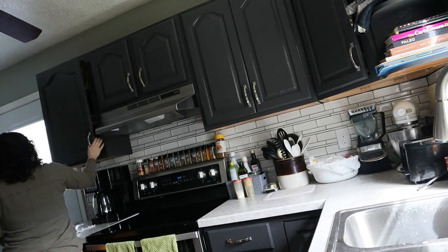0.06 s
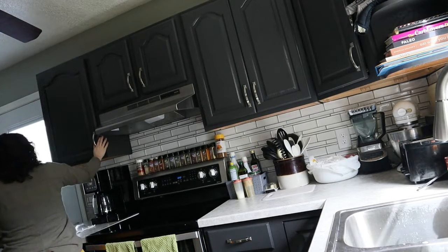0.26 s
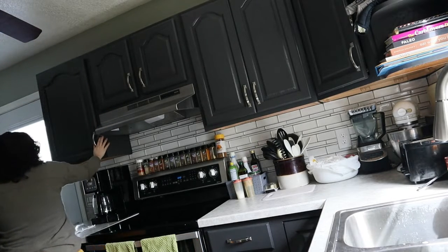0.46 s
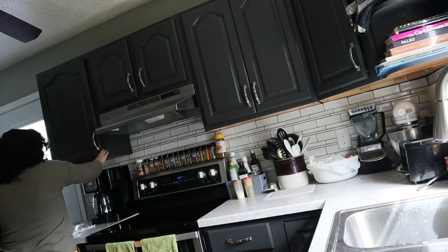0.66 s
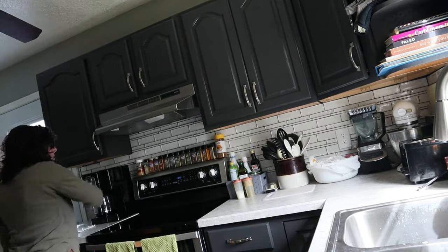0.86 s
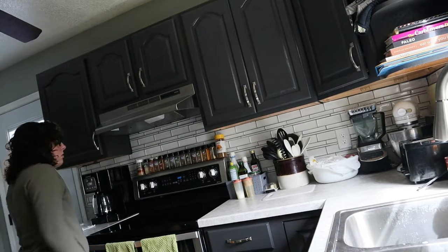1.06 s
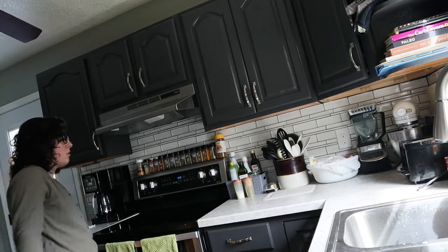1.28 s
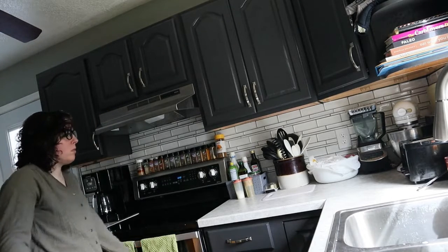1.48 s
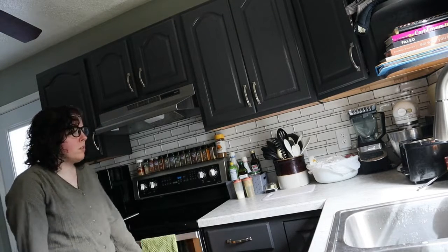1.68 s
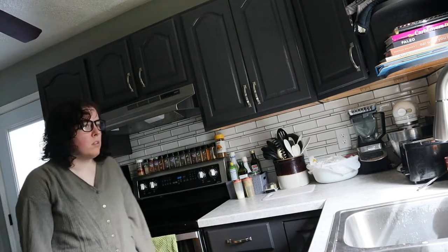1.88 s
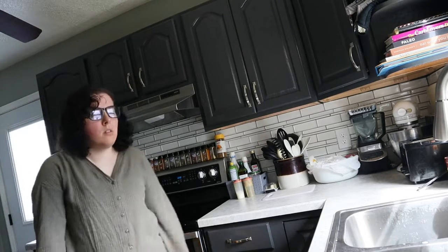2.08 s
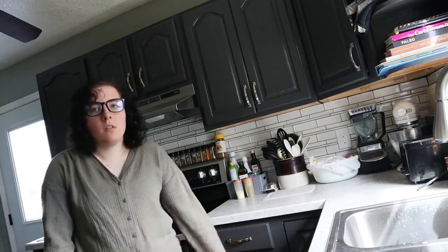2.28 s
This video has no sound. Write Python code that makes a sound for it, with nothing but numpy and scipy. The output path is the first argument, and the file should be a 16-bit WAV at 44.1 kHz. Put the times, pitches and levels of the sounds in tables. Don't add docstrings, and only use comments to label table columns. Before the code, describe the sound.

A wooden wall cabinet door shuts with a small hinge tick, a sharp clack and a low woody boom, then settles; soft slipper scuffs and a heel thump follow over kitchen appliance hum, a few steps from a stereo microphone.

```python
import sys
import numpy as np
from scipy import signal
from scipy.fft import rfft, irfft, next_fast_len
from scipy.io import wavfile
from scipy.ndimage import map_coordinates

SR = 44100
rng = np.random.default_rng(int(sys.argv[2]) if len(sys.argv) > 2 else 0)


def voltage_ratio(level):
    return 10 ** (np.asarray(level, float) / 20)


def master(y):
    cut = np.clip(np.atleast_2d(y).T, -1, 1)
    pcm = np.round(cut * 32767)
    wavfile.write(sys.argv[1], SR, pcm.astype(np.int16))


N = 103149
TIME_S = np.arange(N) / SR

# pitch_hz, side_over_mid_db
STEREO_WIDTH = [(60, -24), (200, -14), (380, -6), (700, -2), (1300, 1.5), (2400, 3), (4400, 6), (8000, 6.5),
                (15000, 7.5)]


def unit(x):
    return x / np.sqrt(np.mean(x ** 2) + 1e-20)


def along(points, hz):
    point_hz, value = np.transpose(points)
    return np.interp(np.log(hz + 1), np.log(point_hz + 1), value)


def filtered(x, response):
    size = next_fast_len(x.shape[-1] + 8192)
    spectrum = rfft(x, size) * response(np.fft.rfftfreq(size, 1 / SR))
    return irfft(spectrum, size)[..., :x.shape[-1]]


def wobble(rate):
    return map_coordinates(rng.standard_normal(512), [TIME_S * rate])


def diffuse(pair, side_db):
    def response(hz):
        return voltage_ratio(side_db(hz) - np.array([along(STEREO_WIDTH, hz), 0 * hz]))
    return filtered(pair, response)


def ring(modes, start_s, level_db, swell_s, spread_s=0, share=1):
    lag_s = 0.005225
    t = np.maximum(TIME_S - start_s, 0)
    total = 0
    for hz, mode_db, t60 in modes:
        decay = voltage_ratio(mode_db - 60 * t / t60 / share)
        rise_s = swell_s + spread_s * (hz > 180)
        swell = (1 - np.exp(-t / rise_s)) ** 2
        total = total + decay * swell * np.sin(2 * np.pi * hz * (lag_s - t))
    return voltage_ratio(level_db) * total


def room_noise():
    # pitch_hz, level_db_per_hz
    tone = [(15, -71), (25, -5.5), (147, -2), (182, 0), (208, -6), (245, -3.5), (820, -18.5), (11700, -47),
            (15300, -59.5)]

    def colour(hz):
        return along(tone, hz) + along(STEREO_WIDTH, np.minimum(hz, 10500))
    broad = diffuse(rng.standard_normal((2, N)), colour)
    return voltage_ratio(-43.5 + 0.27 * wobble(3.63)) * broad / np.std(broad[0])


def motor_hum():
    # pitch_hz, width_hz, level_db
    hum_lines = [(55, 2.9, -65), (116.4, 10, -51), (178.2, 12, -54.5), (234.7, 9.1, -58),
                 (353.5, 30, -62.5)]
    whine_hz, whine_db, drift_rad = 2690, -64, 2.8
    hum = voltage_ratio(whine_db) * np.sin(2 * np.pi * whine_hz * TIME_S + drift_rad * wobble(60))
    for hz, width, db in hum_lines:
        line = filtered(rng.standard_normal(N), lambda f: 1 / (1 + ((f - hz) / width * 2) ** 2))
        hum += voltage_ratio(db) * unit(line)
    return hum * np.array([[1], [.08]])


def kitchen_tail(decay_times):
    hz, when, z = signal.stft(rng.standard_normal((2, SR)), SR, nperseg=256)
    decay = voltage_ratio(-60 * when / along(decay_times, hz)[:, None])
    return signal.istft(z * decay, SR, nperseg=256)[1][:, :SR]


def clacks():
    # start_s, level_db, brightness_db_per_octave, contact_s, room_db
    contacts = [
        (.226, -42, 5.5, 0.0028, -6),
        (.286, -19, -0.5, 0.0085, -2.5),
        (.394, -27.5, 0, 0.0074, -8.5),
        (1.268, -47.5, 14, 0.0022, -4),
        (1.274, -39.5, 15, 0.00082, -14),
        (1.822, -45, -4, 0.0097, -9),
        (1.989, -53.5, 11.5, 0.0037, -0.5),
        (2.008, -45.5, -6, 0.003, -6),
    ]
    # pitch_hz, level_db_per_hz
    contact_colour = [(150, -40), (330, -10), (965, -4), (3540, -6.5), (6300, -21.5), (8000, -19.5),
                      (12500, -25.5), (15300, -44)]
    # pitch_hz, t60_s
    decay_times = [(300, 1), (1000, 0.75), (3000, 0.53), (6000, 0.46), (12000, 0.3)]
    near_db, near_hz = 6, 1200
    out = np.zeros((2, N + SR))
    t = np.arange(SR) / SR
    for start_s, db, bright_db, contact_s, room_db in contacts:
        def colour(hz):
            return along(contact_colour, hz) + bright_db * np.log2(np.clip(hz, 200, 4000) / 2000)
        tail = kitchen_tail(decay_times) * (1 - np.exp(-t / contact_s))
        burst = rng.standard_normal((2, SR)) * t / contact_s * np.exp(1 - t / contact_s)
        noise = burst + voltage_ratio(room_db) * tail
        colour_rms = np.sqrt(np.mean(voltage_ratio(2 * colour(np.fft.rfftfreq(SR, 1 / SR)))))
        hit = voltage_ratio(db) / colour_rms * diffuse(noise, colour) * (t > 0)
        out[:, round(start_s * SR):][:, :SR] += hit

    def centring(hz):
        return voltage_ratio(np.array([0 * hz, -near_db / (1 + (hz / near_hz) ** 4)]))
    return filtered(out[:, :N], centring)


def door():
    # pitch_hz, level_db, t60_s
    rail = [(800, -10, 0.15), (1175, 2, 0.13), (1477, -30, 0.16), (1724, 5, 0.1), (2260, 0, 0.11),
            (2800, -4.5, 0.15), (3470, -3.5, .1)]
    # pitch_hz, level_db, t60_s
    edge = [(53, -17, 0.32), (81, -4.5, 0.27), (106.6, -0.5, 0.39), (132.8, -4, 0.87), (167.5, -8, 0.52),
            (199, 0, 0.22), (242, -5, 0.14), (378, -5.5, 0.19), (430.4, -7, 0.26), (547, -31, 0.87),
            (816.3, -19, 0.57), (937, -16, 0.34)]
    # pitch_hz, level_db, t60_s
    panel = [(55.6, -30, 1), (76.1, -23.5, 1), (89.9, -17.5, 1), (101.47, 0, 0.42), (134.3, -0.5, 0.33),
             (200.5, -21.5, 0.9), (250.6, -9, 0.23), (289.5, -14, 0.27), (370.7, -22, 0.5),
             (591, -35, 0.64), (790, -34.5, 0.36), (1165, -25.5, 0.28)]
    # start_s, level_db, share_of_ring_time
    slams = [
        (.401, -5, 0.82),
        (0.497, -18.5, 0.77),
        (0.534, -27, 0.44),
        (.625, -28.5, 0.52),
        (0.739, -19.5, 0.41),
        (.885, -24.5, 0.15),
    ]
    swell_s, spread_s = 0.0049, 0.006
    boom = ring(rail, .286, -26, 0.0015)
    boom += ring(edge, .29, -12, swell_s)
    for start_s, db, share in slams:
        boom += ring(panel, start_s, db, swell_s, spread_s, share)

    def side_response(hz):
        narrowing_db = 20 * np.clip(1 - hz / 600, 0, 1)
        return voltage_ratio(along(STEREO_WIDTH, hz) + 1 - narrowing_db) * 1j
    return np.array([boom, filtered(boom, side_response)])


def slippers():
    # centre_s, level_db, half_length_s
    strokes = [(0.673, -57, .06), (0.932, -63, 0.025), (1.148, -56.5, 0.016), (1.306, -54, 0.066),
               (1.42, -48.5, 0.036), (1.48, -55, 0.055), (1.665, -63, 0.012), (1.86, -56.5, 0.059),
               (2.013, -58.5, 0.085), (2.169, -55.5, 0.061), (2.277, -55, 0.064)]
    # pitch_hz, level_db_per_hz
    sole_colour = [(410, -26), (700, -13), (1710, 3), (5000, -6), (8340, -10.5), (11500, -7.5),
                   (13000, -24.5), (15300, -32)]
    stroke = sum(voltage_ratio(db) * np.exp(-((TIME_S - centre) / half) ** 2) for centre, db, half in strokes)
    grain = voltage_ratio(1.8 * wobble(70))
    scuff = unit(diffuse(rng.standard_normal((2, N)), lambda hz: along(sole_colour, hz)))
    return stroke * grain * scuff


def heels():
    # start_s, level_db
    thumps = [
        (1.824, -51),
        (2.014, -27),
    ]
    start_hz, rise_hz_per_s, length_s = 40.7, 330, 0.087
    heel = np.zeros(N)
    for start_s, db in thumps:
        t = np.clip(TIME_S - start_s, 0, length_s)
        envelope = np.abs(np.sin(np.pi * (t / length_s) ** 0.39)) ** 0.79
        cycles = t * (start_hz + rise_hz_per_s * t / 2)
        heel += voltage_ratio(db) * envelope * np.sin(2 * np.pi * cycles)
    return heel * np.array([[1], [0]])


def scene():
    mid, side = room_noise() + motor_hum() + clacks() + door() + slippers() + heels()
    return np.array([mid + side, mid - side])


def ride_gain(pair):
    # time_s, gain_db
    gain = [(0, 0.5), (.28, -1.5), (.31, -1.5), (.4, 0.5), (.44, 2), (.52, 1.5), (.62, -1.5), (1.2, 0.5),
            (2.34, .1)]
    low_cut_hz = 25
    cut = filtered(pair, lambda hz: (1j * hz / (low_cut_hz + 1j * hz)) ** 2)
    return cut * voltage_ratio(np.interp(TIME_S, *np.transpose(gain)))


def fold_treble(pair):
    # time_s, edge_hz
    stereo_top = [(0, 13700), (.2, 13900), (.284, 13500), (.288, 16000), (.3, 13400), (.36, 11750),
                  (.45, 9700), (.56, 9250), (.72, 9900), (.9, 11620), (1.14, 12300), (1.29, 11740),
                  (1.5, 9540), (1.65, 11500), (1.8, 11830), (2.02, 11100), (2.1, 10740), (2.34, 9930)]
    band_hz, fold_db, top_hz = 690, 2.5, 15450
    mid_side = np.array([pair[0] + pair[1], pair[0] - pair[1]]) / 2
    hz, t, (mid, side) = (lambda f, s, z: (f, s, z))(*signal.stft(mid_side, SR, nperseg=1024))
    edge_hz = (np.floor(np.interp(t, *np.transpose(stereo_top)) / band_hz) + .5) * band_hz
    mono = 1 / (1 + np.exp(np.clip((edge_hz - hz[:, None]) / 25, -40, 40)))
    folded = np.array([mid + voltage_ratio(fold_db) * mono * side, (1 - mono) * side])
    folded = folded * (hz < top_hz)[:, None]
    mid, side = signal.istft(folded, SR, nperseg=1024)[1][:, :N]
    return np.array([mid + side, mid - side])


def band_limit(x):
    return signal.sosfilt(signal.butter(12, 15530, fs=SR, output="sos"), x)


def record(dry):
    mix = fold_treble(ride_gain(dry))
    return band_limit(mix)


dry = scene()
out = record(dry)
master(out)
```